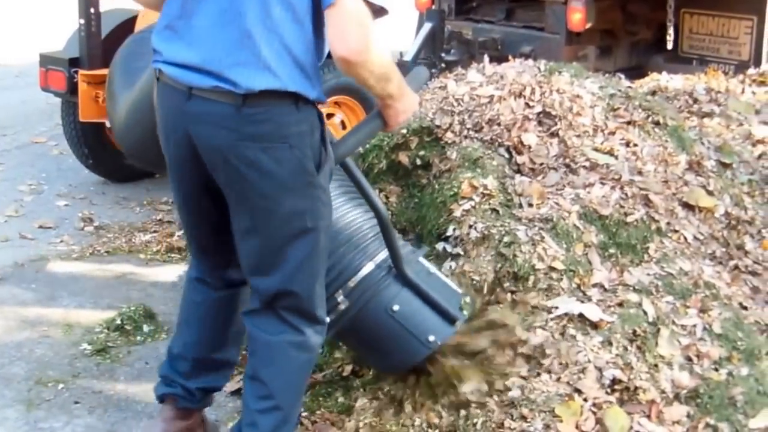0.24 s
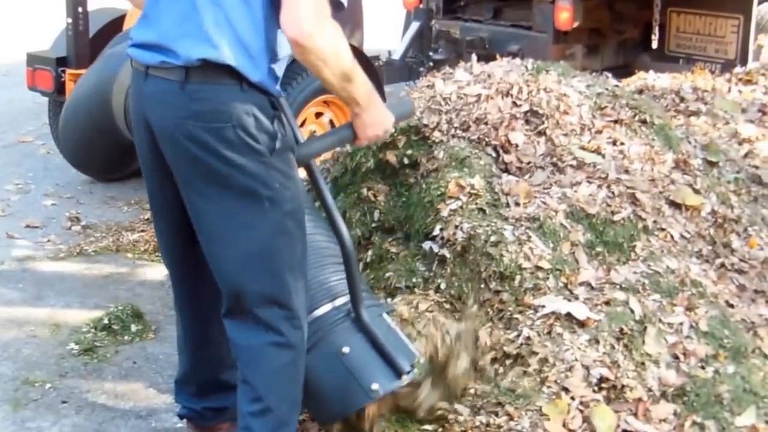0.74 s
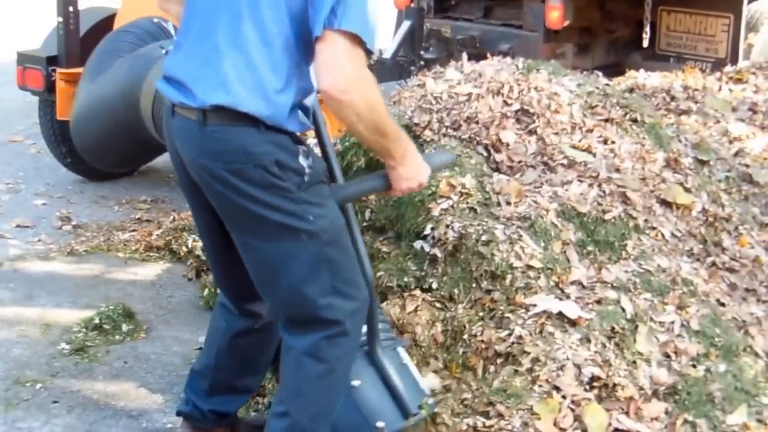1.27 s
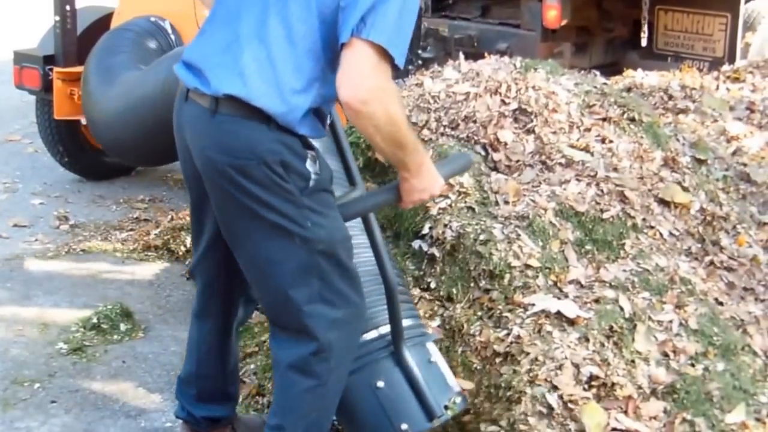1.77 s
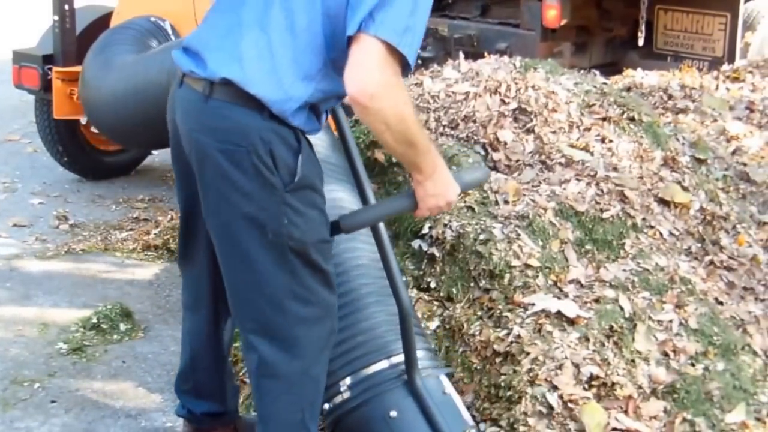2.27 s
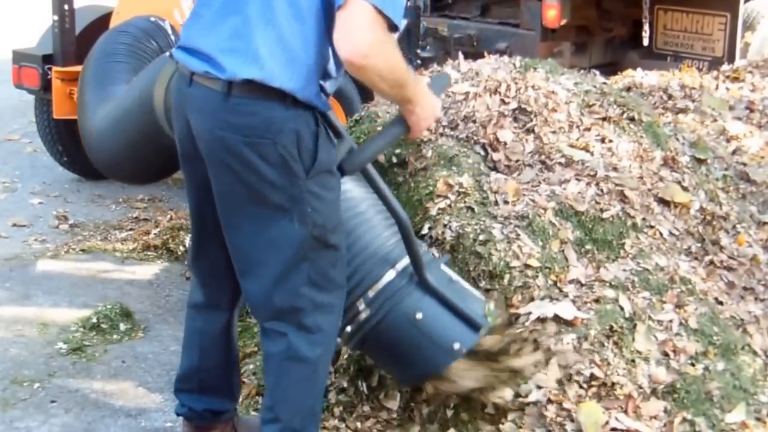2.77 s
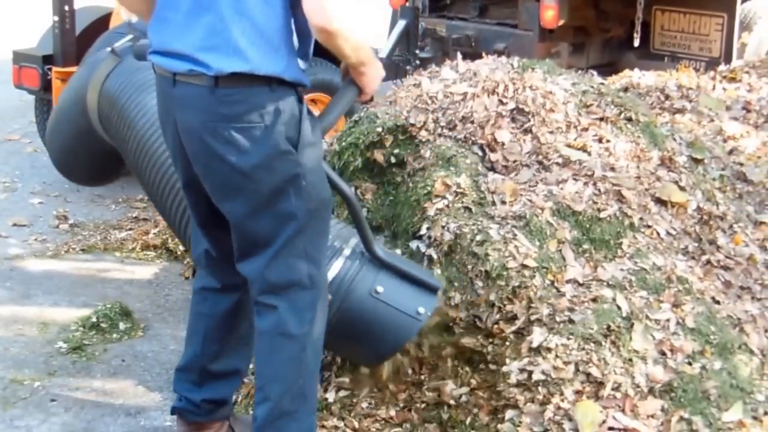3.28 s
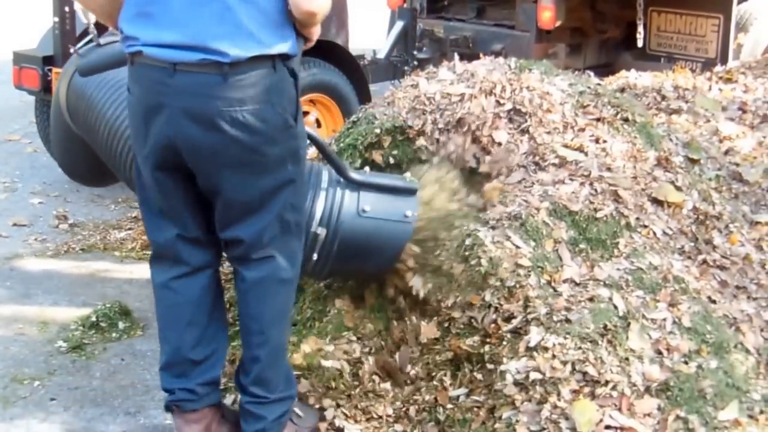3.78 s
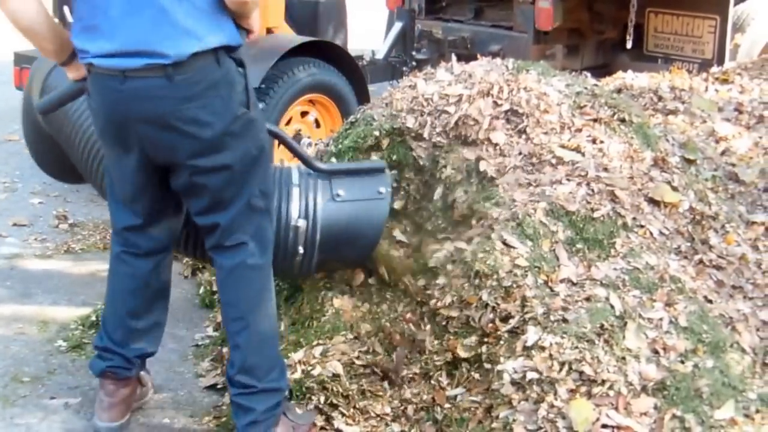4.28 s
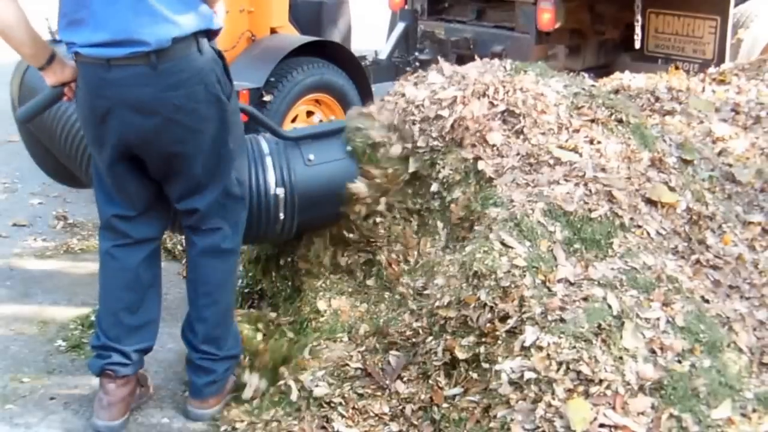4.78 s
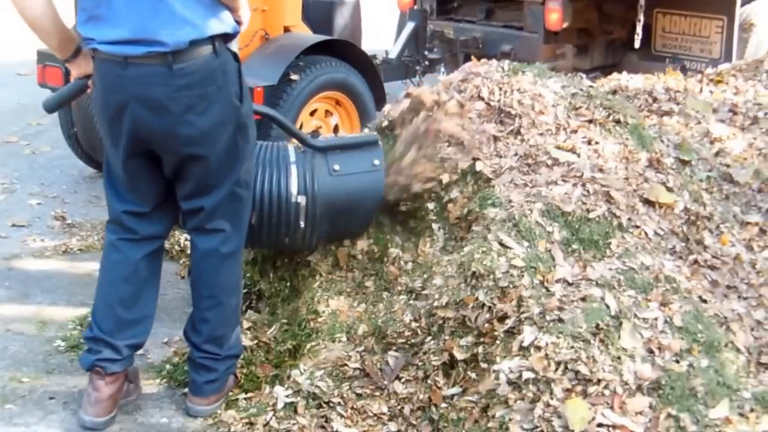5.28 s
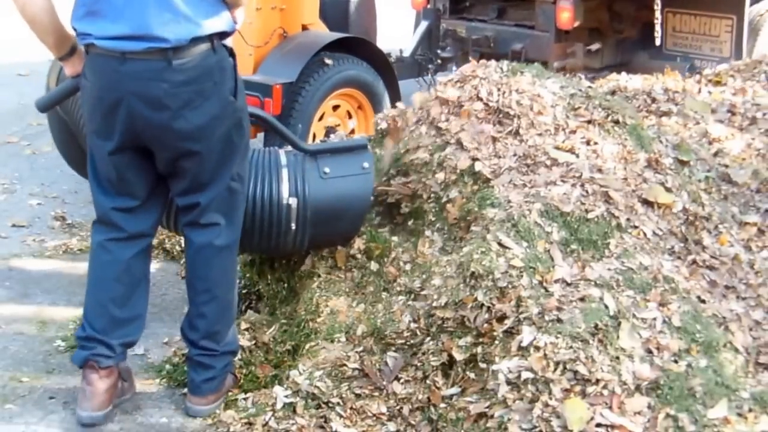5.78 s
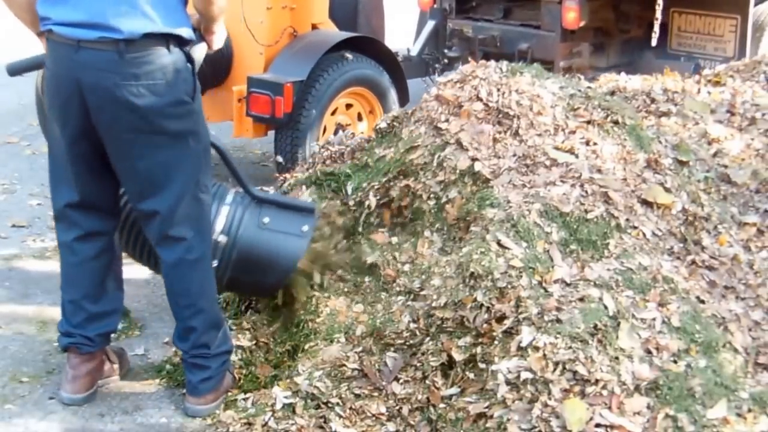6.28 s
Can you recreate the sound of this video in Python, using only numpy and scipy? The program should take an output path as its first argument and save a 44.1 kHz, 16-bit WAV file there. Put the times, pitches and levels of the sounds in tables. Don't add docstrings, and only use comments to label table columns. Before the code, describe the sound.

Already running at 0 s, a two-cylinder engine throbs with an uneven exhaust beat, its four-blade fan making a smooth hum near 210 Hz. Air roars and hisses through the ribbed hose, with crisp leaf rustle and fine crackle. Around 0.7-1.0 s a clump shreds and knocks the steel, and the pitch sags noticeably, recovering by 1.6 s. From 1.2 to 3.5 s the hum dominates, wavering, with scattered ticks, light link jingle, a small thud at 2.1 s and a sharp stone tick at 3.1 s. After 3.9 s the hum recedes and broad leafy rush swells, densest at 5.4-5.8 s. Clumps thud at 4.05, 4.4, 4.85, 5.4-5.5 and 5.7-6.1 s, with a heavy hollow knock at 5.87 s and the engine bogging again. Hum partly returns by 6.3 s; a loud bright crack hits at 6.39 s. Soft wind lumps buffet the close stereo microphone, and everything continues to the end.

```python
import sys
import numpy as np
from scipy import signal
from scipy.fft import rfft, irfft
from scipy.io import wavfile
from scipy.ndimage import uniform_filter1d

SR = 44100
rng = np.random.default_rng(int(sys.argv[2]) if len(sys.argv) > 2 else 0)


def unload_wav(signal):
    wavfile.write(
        sys.argv[1],
        SR,
        np.round(np.clip(np.atleast_2d(signal).T, -1, 1) * 32767).astype(np.int16),
    )


def how_loud(loudness_db):
    steps = np.asarray(loudness_db, float) / 20
    return 10 ** steps


N = 288414


def rms_one(x):
    return x / np.sqrt(np.mean(x ** 2) + 1e-20)


def in_time(rows):
    s, *columns = np.transpose(rows)
    return [np.interp(np.arange(N) / SR, s, c) for c in columns]


def at_hz(points, hz):
    table_hz, value = np.transpose(points)
    return np.interp(np.log(hz), np.log(table_hz), value)


def drift(rate_hz):
    r = np.exp(-80 * np.pi * rate_hz / SR)
    noise = rng.standard_normal(N // 40 + 2002)
    slow = signal.lfilter([1], [1, -2 * r, r * r], noise)[2000:]
    return np.interp(np.arange(N) / 40, np.arange(len(slow)), rms_one(slow))


def band(x, low_hz, high_hz):
    sos = signal.butter(2, [low_hz, min(high_hz, .45 * SR)], "band", fs=SR, output="sos")
    return signal.sosfilt(sos, x)


def ring(blows, hz, t60_s):
    r, w = how_loud(-60 / (t60_s * SR)), 2 * np.pi * hz / SR
    out = signal.lfilter([0, np.sin(w)], [1, -2 * r * np.cos(w), r * r], blows)
    return out / np.abs(out).max()


def coarse(shape_db):
    t = np.arange(0, N / SR + .001, .001)
    return np.interp(np.arange(N) / SR, t, shape_db(t))


def bells(rows):
    return coarse(lambda t: sum(db * np.exp(-((t - s) / half) ** 2) for s, db, half in rows))


# start_s, level_db
WIND = [(0, -42), (.3, -37), (.6, -44), (.78, -35), (1.1, -42), (1.25, -39.5), (2.4, -48), (3.2, -51),
        (3.85, -52), (4.1, -35), (4.3, -44), (4.5, -34.5), (4.65, -41), (4.8, -31), (5.15, -41), (5.5, -41),
        (5.75, -37.5), (6.3, -33)]


def wind():
    lumps = how_loud(in_time(WIND)[0] + 2.1 * drift(7.1) + 1.5)
    return lumps * rms_one(band(rng.standard_normal(N), 30, 220)) * [[1], [-1]]


# pitch_hz, likeness (1 = the same)
LIKENESS = [(60, 0.93), (99, 0.91), (160, 1), (270, 0.93), (440, 0.99), (730, 1), (1200, 0.96),
            (1970, 0.95), (3250, 0.88), (5360, 0.71), (8820, 0.56), (14500, 0.38)]
# pitch_hz, left_minus_right_db
LEAN = [(60, -5), (240, -1), (930, -1), (3680, -1.5), (8000, -2), (14500, -3.5)]


def air(spectrum, patchy_db, grains_per_s, grain_db, low_hz, high_hz):
    out, together = 0, drift(5.0)
    first, last = spectrum[0][0], spectrum[-1][0]
    edges = np.geomspace(first, last, int(4 * np.log2(last / first)) + 2)
    white = rng.standard_normal((2, 2, N))
    snapped = rng.random(N) < grains_per_s / SR
    snaps = snapped * how_loud(2.8 * np.minimum(rng.exponential(1, N), 4))
    white = white * (1 + how_loud(grain_db) * signal.lfilter([1], [1, -.97], snaps))
    for k, (low, high) in enumerate(zip(edges, edges[1:])):
        hz = np.sqrt(low * high)
        level_db = at_hz(spectrum, hz)
        if level_db < -20:
            continue
        mid, side = band(white[k % 2], low, high)
        alike = np.clip(at_hz(LIKENESS, hz), -1, 1)
        gain = how_loud(level_db + patchy_db * (0.62 * together + drift(15.0)))
        lean = how_loud(at_hz(LEAN, hz) / 2 * np.array([[1], [-1]]))
        stereo = np.sqrt(1 + alike) * mid + np.sqrt(1 - alike) * side * [[1], [-1]]
        out = out + gain * lean * stereo
    return out / np.std(band(out.mean(axis=0), low_hz, high_hz))


# pitch_hz, level_db (per Hz)
RUMBLE = [(32, -3), (45, 0), (60, -2.5), (100, 0.5), (150, -1), (220, -6.5), (330, -13)]


def rumble(roar_db):
    load_db = uniform_filter1d(roar_db, SR // 2)
    return how_loud(.5 * load_db - 13.5) * air(RUMBLE, 0.52, 1, -30, 30, 300)


# start_s, level_db
FLOW = [(0, -34.5), (.25, -34), (.62, -29.5), (.88, -30), (1.0, -34), (1.4, -34.5), (2.05, -32.5),
        (2.4, -35), (3.1, -37), (3.4, -33.5), (3.76, -35), (4.04, -31), (4.5, -28), (5.12, -28.5),
        (5.5, -26.5), (5.78, -26), (6.2, -30.5), (6.54, -31.5)]
# centre_s, level_db, half_length_s
SURGES = [(.05, -1, 0.13), (.55, 0.5, 0.055), (.8, -1.5, .04), (2.37, -2, 0.055), (4.22, -1, 0.051),
          (5.08, -1.5, .08), (5.3, 0.5, 0.05), (5.44, 1, .04), (1.72, -0.5, 0.12), (4.45, 0, .1),
          (3.2, 0, .1), (5.63, -1.5, .06)]
MEAN_FLOW_DB, TRAVEL_S = -33, 0.058


def leaf_flow():
    mouth_db, = in_time(FLOW)
    swing_db, = in_time([(s + TRAVEL_S, db - MEAN_FLOW_DB) for s, db in FLOW])
    surge_db = bells(SURGES)
    return mouth_db + surge_db, swing_db + surge_db


# pitch_hz, level_db (per Hz)
ROAR = [(160, -77), (280, -10), (330, 2), (372, -1.5), (424, 2), (563, 0), (795, -3.5), (945, 3.5),
        (1080, -8), (2050, -15), (2200, -14), (2860, -42), (4840, -120)]


def roar(roar_db, chuff):
    return how_loud(roar_db - 1.5) * chuff * air(ROAR, 0.95, 60, -4, 450, 1850)


# pitch_hz, level_db (per Hz)
RUSH = [(880, -53), (1500, -6), (1810, 4.5), (1970, -17), (2300, 0.5), (3110, -1), (3780, -5), (4080, -2.5),
        (8000, -12.5), (10400, -40), (17600, -120)]


def rush(mouth_db, chuff):
    return how_loud(mouth_db - 1.2) * chuff * air(RUSH, 1.1, 150, -18, 1200, 8400)


# pitch_hz, width_hz, level_db
DUCT = [(505, 23, 4), (864, 29, 3), (1060, 190, -3.5), (1317, 215, 8.5), (1670, 30, -1), (2244, 104, 8.5),
        (2517, 65, 4), (3080, 36, 3.5)]


def duct(x):
    for hz, width_hz, db in DUCT:
        w, a = 2 * np.pi * hz / SR, how_loud(db / 2)
        damp = np.pi * width_hz / SR
        top = [1 + damp * a, -2 * np.cos(w), 1 - damp * a]
        bottom = [1 + damp / a, -2 * np.cos(w), 1 - damp / a]
        x = signal.lfilter(top, bottom, x)
    return x


# start_s, level_db
JERKS = [(.07, -30), (.32, -32), (.5, -29.5), (1.05, -30), (1.3, -34), (1.82, -28.5), (2.25, -29),
         (2.5, -29), (2.82, -27.5), (3.3, -37), (3.8, -38), (4.5, -30), (4.85, -27), (5.2, -22.5),
         (5.78, -37)]
CALM_DB, SETTLE_DB_PER_S, JERK_S = -38, 17.5, 0.038


def shaking():
    def settling(t):
        each = [np.where(t >= s, db - SETTLE_DB_PER_S * (t - s), CALM_DB) for s, db in JERKS]
        return np.max(each, axis=0)
    return uniform_filter1d(np.maximum(coarse(settling), CALM_DB), int(JERK_S * SR))


# pitch_hz, level_db (per Hz)
RUSTLE = [(4000, -33), (5500, 2), (7500, 2), (9500, 5.5), (11000, 5.5), (12200, 5), (13300, 2),
          (14800, 0.5)]


def rustle(mouth_db, shaking_db):
    rustle_db = -34 + 0.95 * (mouth_db - MEAN_FLOW_DB) + 0.17 * (shaking_db - CALM_DB)
    return how_loud(rustle_db) * air(RUSTLE, 1.0, 130, -5.5, 5300, 16700)


# start_s, level_db (rms),
# pitch_hz (centre)
POPS = [(.12, -33, 11000), (.19, -32, 11000), (.23, -32, 11000), (.29, -29, 2300), (.483, -25, 11000),
        (.667, -26, 10500), (.98, -23, 262), (1.005, -29, 2300), (1.128, -29, 9000), (1.203, -29, 2300),
        (1.241, -31, 5500), (1.388, -32, 10500), (1.405, -31, 2300), (1.468, -29, 2300), (1.524, -30, 7500),
        (1.83, -29, 2300), (1.87, -31, 10500), (1.895, -31, 10500), (2.136, -29, 3200), (2.437, -33, 2300),
        (2.451, -30, 5500), (2.575, -32, 2300), (2.62, -34, 5500), (2.772, -34, 5500), (2.865, -31, 8000),
        (2.92, -32, 10500), (2.96, -29, 10000), (3.036, -30, 11000), (3.162, -33, 11000),
        (3.363, -30, 9500), (3.549, -27, 10500), (3.914, -29, 2300), (4.269, -25, 11000),
        (4.32, -29, 11000), (4.952, -25, 10500), (4.999, -24, 10500), (5.03, -27, 5500),
        (5.201, -25, 10500), (5.391, -21, 2300), (5.501, -20, 2300), (5.864, -27, 850), (5.888, -24, 2300),
        (6.27, -27, 2600), (6.32, -28, 2500), (6.12, -27, 2500), (5.35, -25, 1500), (5.43, -25, 1600),
        (4.738, -26, 800), (5.666, -24, 800), (5.695, -25, 800), (5.785, -24, 850), (5.964, -26, 850),
        (6.084, -26, 900), (5.487, -25, 800), (5.127, -29, 1600), (5.2, -28, 1600), (5.382, -23, 1600),
        (5.455, -26, 1600), (5.503, -25, 1600), (5.575, -28, 1600), (5.74, -26, 1600), (5.8, -28, 1600),
        (6.07, -28, 1600), (4.408, -24, 4500)]


def pops():
    out, age = np.zeros((2, N + SR)), np.arange(SR // 6) / SR
    for s, db, hz in POPS:
        noise = rng.standard_normal((3, len(age)))
        wide = 1.4 if hz > 500 else 1.1
        puff = rms_one(band(noise[0] + 0.36 * noise[1:], hz / wide, hz * wide))
        t60_s = .06 + 25 / hz
        fade = np.minimum(age / .0015, 1) * how_loud(db + 1.5 - 60 * age / t60_s)
        at = round(s * SR)
        out[:, at:at + len(age)] += fade * puff
    return out[:, :N]


# start_s, level_db (peak), pitch_hz (centre), crack_db (first crack)
TICKS = [(.078, -20, 11500, -12), (.317, -20, 11500, -14), (.407, -20, 11500, -12), (.482, -18, 11400, -12),
         (.668, -20, 6560, -12), (1.127, -20, 11000, -14), (1.593, -16.5, 4400, -6),
         (1.82, -18, 10200, -14), (1.935, -20, 10500, -14), (2.494, -18, 5000, -8),
         (2.811, -18, 10500, -12), (2.96, -21, 11500, -12), (2.999, -20, 11500, -12),
         (3.119, -21.5, 10500, 24), (3.257, -21, 8000, -14), (3.328, -19, 12000, -14),
         (3.493, -20, 6000, -14), (3.548, -18, 4000, -3), (3.98, -18, 10000, -12),
         (4.073, -15.5, 3600, -10), (4.952, -15.5, 5000, -4), (5.029, -20, 6380, -12),
         (5.25, -16, 7000, -12), (5.33, -15, 10500, -12), (5.779, -13, 8000, -4), (6.25, -19, 5000, -8),
         (6.3885, -7.5, 6500, 3), (6.47, -19, 4500, -12)]


def ticks():
    out, age = np.zeros((2, N + SR)), np.arange(SR // 4) / SR
    for s, db, hz, crack_db in TICKS:
        t60_s = .125 * (8e3 / hz) ** .2 - .0026 * (crack_db + 11.0)
        noise = rng.standard_normal((3, len(age)))
        noise = noise[0] + .45 * noise[1:]
        wide = rms_one(band(noise, hz / 1.9, hz * 2.0))
        narrow = rms_one(band(noise, hz / 1.35, hz * 1.45))
        tail = (narrow + 2.2 * wide) * how_loud(-60 * age / max(t60_s, .012))
        crack = how_loud(crack_db - 60 * age / .013) * rms_one(band(noise, 7500, 14500))
        at = round(s * SR)
        out[:, at:at + len(age)] += how_loud(db - 17.0) * np.minimum(age / .0008, 1) * (tail + crack)
    return out[:, :N]


# pitch_hz, level_db, t60_s
LINKS = [(8125, -7, .06), (8310, -8, .08), (9230, -7, .06), (9505, -6, .05), (10050, -5, .06),
         (11190, -3, .07), (11320, -2, .08), (11390, -4, .07), (11550, -4, .07), (12020, -6, .06),
         (12540, -4, .07), (12705, -7, .06), (13205, -7, .07)]


def links(shaking_db):
    touched = rng.random(N) < 110 / SR
    touched[[round(s * SR) for s, _, hz, _ in TICKS if hz > 9000]] = True
    out = 0
    for hz, db, t60_s in LINKS:
        touches = touched * rng.standard_normal(N) + 1e-18
        sides = how_loud(rng.normal(0, 3.8, (2, 1)))
        out = out + how_loud(db) * rms_one(ring(touches, hz, t60_s)) * sides
    return how_loud(shaking_db - 16.5) * out


# start_s, pitch_hz, level_db (peak), t60_s
STONES = [(3.1205, 7800, -30, .07), (3.1205, 6200, -33, .045), (3.1194, 11500, -19, .012),
          (3.1198, 13200, -19, .012), (5.8655, 180, -4.5, .022), (5.866, 820, -14, .05),
          (6.3895, 6900, -9, .006), (6.3895, 11500, -16, .01), (6.391, 3050, -25, .12),
          (6.03, 830, -20, .12), (4.186, 900, -20, .04)]


def stones():
    out, age = np.zeros(N + SR), np.arange(SR // 4) / SR
    for s, hz, db, t60_s in STONES:
        at = round(s * SR)
        out[at:at + len(age)] += how_loud(db - 60 * age / t60_s) * np.sin(2 * np.pi * hz * age)
    return out[:N] * how_loud([[-.6], [.6]])


# start_s, knock_db, panel_db (housing ring), hiss_db (shredding), length_s
CLUMPS = [(.67, -42, -40, -29, .07), (.86, -36, -38, -24, .04), (.895, -28, -22, -36, .02),
          (2.135, -30, -36, -31, .03), (4.05, -29, -36, -35, .05), (4.42, -30, -38, -29, .03),
          (4.845, -22, -27, -23, .04), (5.368, -24, -36, -23, .035), (5.445, -24, -38, -32, .013),
          (5.49, -22, -36, -21, .035), (5.71, -27, -26, -29, .03), (5.856, -24, -32, -20, .045),
          (5.865, -22, -24, -28, .014), (6.025, -21, -28, -27, .04), (6.11, -30, -25, -36, .04)]
# pitch_hz, level_db, t60_s
HOUSING = [(510, -4, 0.015), (653, -2.5, 0.066), (849, 0, 0.11), (1007, -5, 0.031), (1250, -4, 0.019),
           (1640, -9, 0.015)]


def clumps():
    out, age = np.zeros((2, N + SR)), np.arange(SR // 2) / SR
    for s, knock_db, panel_db, hiss_db, length_s in CLUMPS:
        thump_db = knock_db - 2.5 + 11 * (length_s < .012)
        length_s = max(length_s, .004)
        spread = np.minimum(age / 0.0024, 1) / (1 + (age / length_s) ** 4)
        noise = rng.standard_normal((3, len(age)))
        uneven = rms_one(uniform_filter1d(rng.standard_normal(len(age)), size=60))
        noise *= how_loud(2.5 * uneven)
        spray = noise[0] * spread
        body = how_loud(knock_db - 11.5) * spread * rms_one(band(noise[0], 500, 1130))
        detune = rng.normal(1, .04, len(HOUSING))
        strike_db = rng.normal(0, 2, len(HOUSING))
        for (hz, db, t60_s), bend, extra_db in zip(HOUSING, detune, strike_db):
            body += how_loud(knock_db + db + extra_db) * ring(spray, hz * bend, t60_s)
        body += how_loud(panel_db) * ring(np.exp(-age / .0005), 512, .38)
        body += how_loud(thump_db) * ring(np.exp(-age / 0.00058), 200, .045)
        hiss = how_loud(hiss_db) * spread * rms_one(band(noise[0] + 0.27 * noise[1:], 2200, 12700))
        at = round(s * SR)
        out[:, at:at + len(age)] += body + hiss
    return out[:, :N]


# start_s, speed_hz (cycles per s), beat_db (exhaust), fifth_db (bark of line 5)
ENGINE = [(0, 26.5, -26, -38), (.3, 27.2, -27.5, -32), (.54, 27.5, -24, -36), (.7, 25.75, -23.5, -28),
          (.87, 25.8, -25, -25.5), (.98, 23.7, -27.5, -25.5), (1.6, 26.2, -26, -31), (1.9, 26.6, -25, -44),
          (2.26, 25.9, -27, -38.5), (3.25, 27.15, -29.5, -34.5), (3.52, 27.1, -27.5, -35.5),
          (3.95, 28.2, -28, -31.5), (4.45, 27.82, -26, -28.5), (4.97, 26.4, -25, -29),
          (5.32, 27.7, -27, -27.5), (5.87, 25.9, -24.5, -27), (6.02, 24.7, -24.5, -28),
          (6.54, 26.3, -24.5, -31.5)]
# centre_s, change_hz (cycles per s), half_length_s
SPEED_SWAYS = [(.92, -0.787, 0.0441), (5.82, .25, 0.082), (6.2, -0.49, 0.15), (4.76, 0.22, 0.097),
               (5.15, .3, 0.098), (5.56, 0.403, .14), (6.37, -0.37, .09)]
FLYWHEEL_S, FREE_SPEED_HZ = .035, 27


def engine():
    speed_hz, beat_db, fifth_db = in_time(ENGINE)
    speed_hz = uniform_filter1d(speed_hz + bells(SPEED_SWAYS), int(FLYWHEEL_S * SR))
    sag_hz = np.maximum(FREE_SPEED_HZ - speed_hz, 0)
    return np.cumsum(speed_hz) / SR, sag_hz, beat_db, fifth_db


# line (multiple of the cycle rate), level_db
EXHAUST = [(1, -12.5), (2, -2.5), (3, -11), (4, -22), (5, -10.5), (6, -10.5), (7, -16), (8, 0), (9, -54),
           (10, -26), (11, -17), (12, -35), (13, -18), (14, -31.5), (15, -32)]
# centre_s, level_db, half_length_s
FIFTH_SWELLS = [(.2, 3, .2), (.9, 1, 0.074), (1.9, 7, 0.099), (2.4, -3, .15), (6.15, 3.5, .12)]
# centre_s, level_db, half_length_s
SIXTH_SWELLS = [(2.5, 5, 0.13), (3.9, 3.5, 0.13), (2.4, -7, 0.11), (2, -1, 0.11), (7.1, -2, 0.13),
                (6.36, 11, 0.077), (5.15, 3, 0.086)]
SECOND_FIRING = 3 / 8
OUTLET_TURN = 1.75


def exhaust(turns, sag_hz, beat_db, fifth_db, swing_db):
    out, level = 0, dict(EXHAUST)
    fifth_db = fifth_db + bells(FIFTH_SWELLS)
    sixth_db = -34.5 + 0.71 * swing_db + bells(SIXTH_SWELLS)
    bark_db = (fifth_db - level[5] + sixth_db - level[6]) / 2
    own = {2: beat_db, 5: fifth_db, 6: sixth_db}
    for k, db in EXHAUST:
        if k % 8 == 0:
            continue
        pair = np.angle(1 + np.exp(-2j * np.pi * k * SECOND_FIRING))
        line_db = own.get(k, db + (beat_db - level[2] if k < 4 else bark_db))
        if k > 6:
            line_db = line_db + 0.28 * (swing_db - 5.5)
        if k > 8:
            line_db = line_db - 1.5 * sag_hz
        lag = .12 * drift(5) + .045 * k * k
        flutter_db = 1.1 * drift(5)
        out = out + how_loud(line_db + flutter_db) * np.cos(2 * np.pi * k * turns + pair - lag + OUTLET_TURN)
    return np.sqrt(2) * out


# start_s, blade_db (blade tone), octave_db
HUM = [(0, -18, -40.5), (.62, -17.5, -45), (.76, -12, -41), (1.05, -15.5, -38), (1.24, -11.5, -39.5),
       (1.58, -9.5, -41), (1.95, -13.5, -38.5), (2.24, -9.5, -38.5), (2.85, -11, -40), (3.28, -15, -46.5),
       (3.44, -10.5, -37.5), (3.86, -22.5, -38), (4.45, -23.5, -32), (4.68, -15, -33), (4.95, -28.5, -37),
       (5.55, -32, -42), (6.2, -22, -34.5), (6.33, -14.5, -39)]


def hum_levels():
    return in_time(HUM)


# centre_s, change_db (hum), half_length_s
GULPS = [(.7, 1, 0.023), (.872, -3.5, .014), (.9, 2, .014), (.965, 0.5, .02), (1.05, 2, 0.029),
         (5.165, 3.5, 0.018), (6.24, -2, 0.018), (.94, -4, 0.016), (.995, -6, 0.021), (1.24, 2, 0.025),
         (2.08, -1, 0.062), (2.46, -1.5, 0.053), (2.58, 0.5, 0.03), (2.64, -1.5, 0.046), (4.1, -3.5, .04),
         (4.17, 4, .025), (4.23, -4, 0.032), (5.04, -5, 0.041), (5.12, -11, .02), (5.24, 1, .03),
         (5.27, 0, 0.014), (5.35, 5, .03), (5.61, -19, 0.062), (5.72, 3.5, 0.054), (5.87, 7, 0.075),
         (6.01, -6.5, 0.028), (6.05, 3.5, 0.021), (6.1, -5, 0.029)]
# centre_s, level_db, half_length_s
OCTAVE_SWELLS = [(.3, -6, .15), (.93, 7, 0.069), (2.75, 5.5, 0.13), (5.37, 12.5, 0.16), (5.78, -19, 0.18)]
WAD_JOLT = .0015


def fan(turns, blade_db, octave_db):
    wads_db = bells(GULPS)
    turns = turns + WAD_JOLT * np.minimum(wads_db, 0) * drift(22)
    blade_db = blade_db + wads_db
    octave_db = octave_db + bells(OCTAVE_SWELLS)
    third_db = -64 + bells([(2.97, 18, 0.42)])
    phase = 16 * np.pi * turns + 0.05 * drift(46)
    tone = how_loud(blade_db + 0.65 * drift(50)) * np.sin(phase)
    tone = tone + how_loud(octave_db + 0.81 * drift(11.0)) * np.sin(2 * phase)
    tone = tone + how_loud(third_db + 2.0 * drift(7.4)) * np.sin(3 * phase)
    return np.sqrt(2) * tone


def scene():
    mouth_db, swing_db = leaf_flow()
    shaking_db = shaking()
    turns, sag_hz, beat_db, fifth_db = engine()
    blade_db, octave_db = hum_levels()
    open_db = np.maximum(blade_db + 12.5, -6)
    roar_db = -33.5 + 0.93 * swing_db - 0.2 * open_db
    chuff = 1 + 0.046 * np.cos(4 * np.pi * turns) + 0.083 * np.cos(2 * np.pi * turns)

    machine = fan(turns, blade_db, octave_db) + exhaust(turns, sag_hz, beat_db, fifth_db, swing_db)
    moving_air = rumble(roar_db) + duct(roar(roar_db, chuff) + rush(mouth_db, chuff))
    leaves = rustle(mouth_db, shaking_db)
    thuds = clumps()
    small_bits = (ticks() + links(shaking_db) + pops()) * how_loud([[-.9], [.9]])
    debris = thuds + small_bits + stones()
    return machine * how_loud([[-.4], [.4]]) + moving_air + leaves + debris + wind()


def band_limit(x):
    return signal.sosfilt(signal.butter(12, 14650, fs=SR, output="sos"), x)


# pitch_hz, lead_radians
PORT_LEAD = [(0, 0.03), (6120, 0.12), (12600, 0.6), (14700, 0.5)]


def record(dry):
    lead = np.interp(np.fft.rfftfreq(N, 1 / SR), *np.transpose(PORT_LEAD))
    late_right = irfft(rfft(dry[1]) * np.exp(-1j * lead), N)
    ports = np.stack([dry[0], late_right])
    rounded = 1.742 * np.tanh(ports / 1.566)
    top_cut = signal.ellip(12, .3, 80, 14150, fs=SR, output="sos")
    mix = signal.sosfilt(top_cut, rounded)
    return band_limit(mix)


dry = scene()
out = record(dry)
unload_wav(out)
```